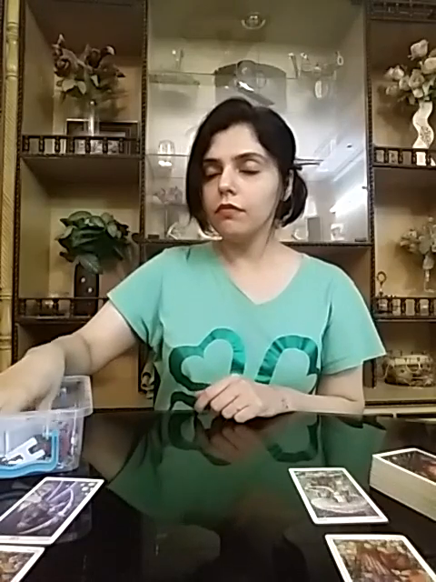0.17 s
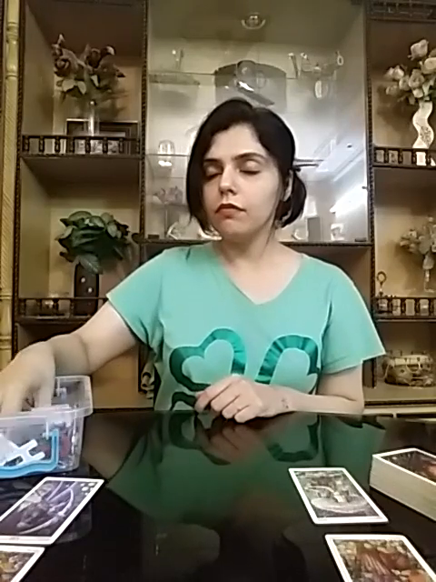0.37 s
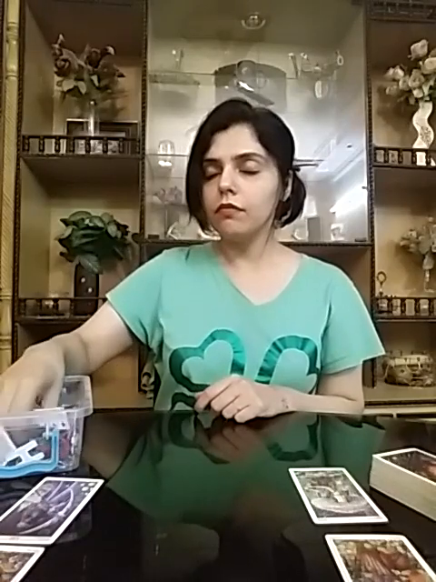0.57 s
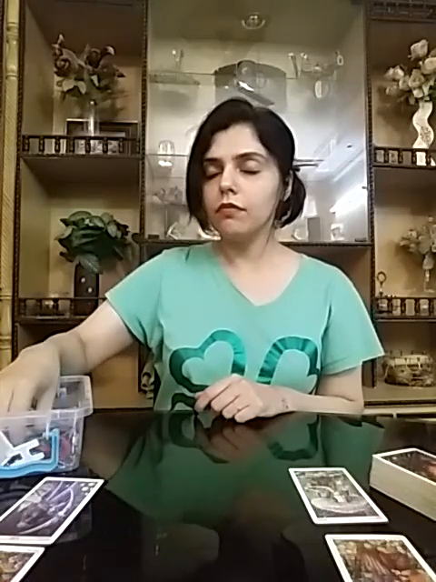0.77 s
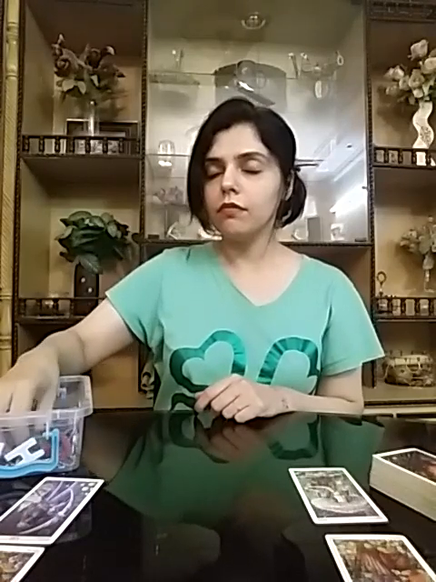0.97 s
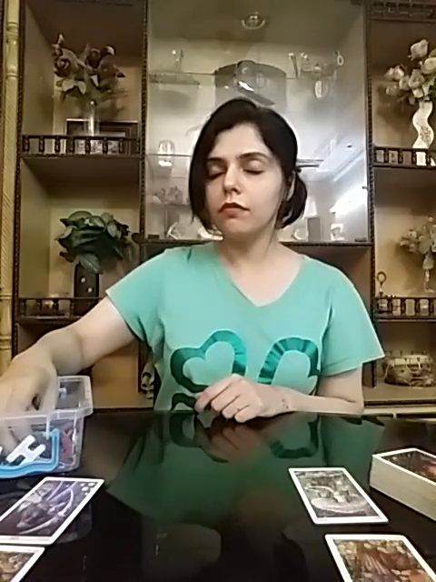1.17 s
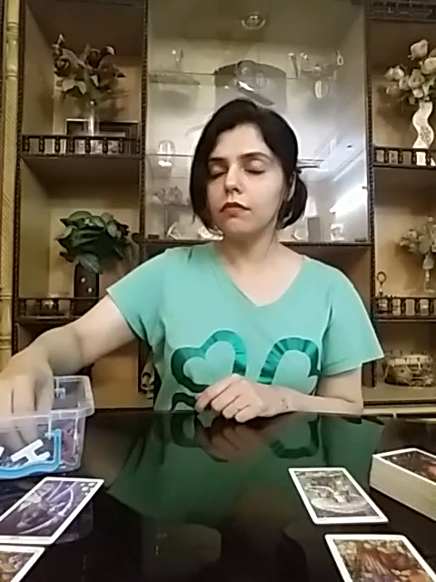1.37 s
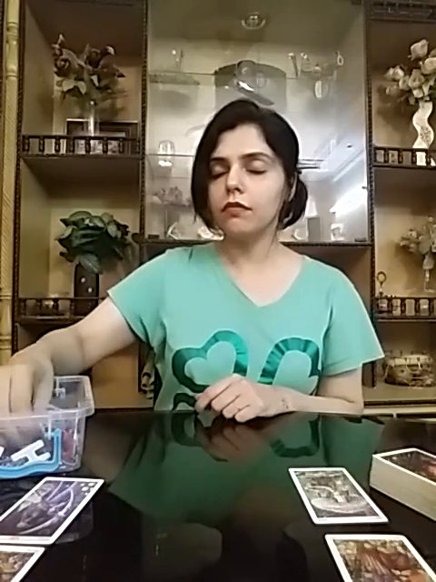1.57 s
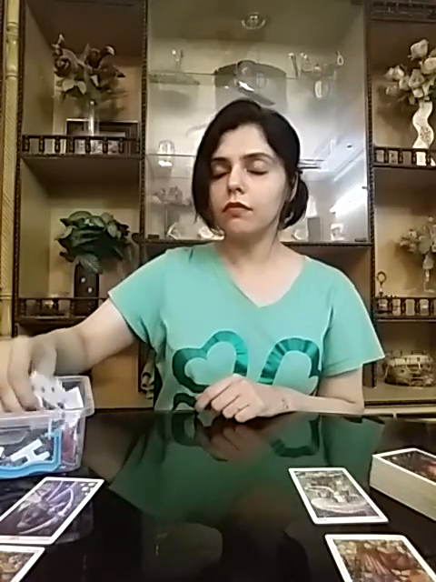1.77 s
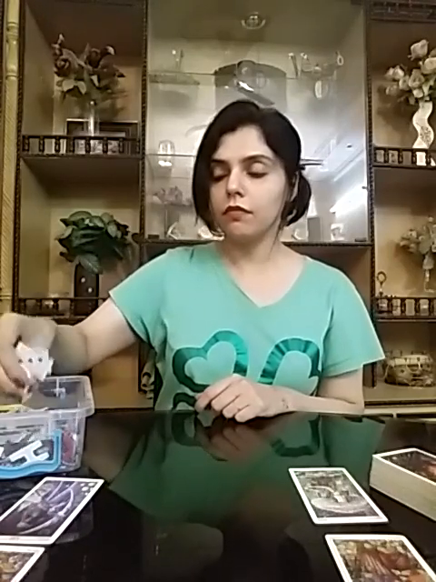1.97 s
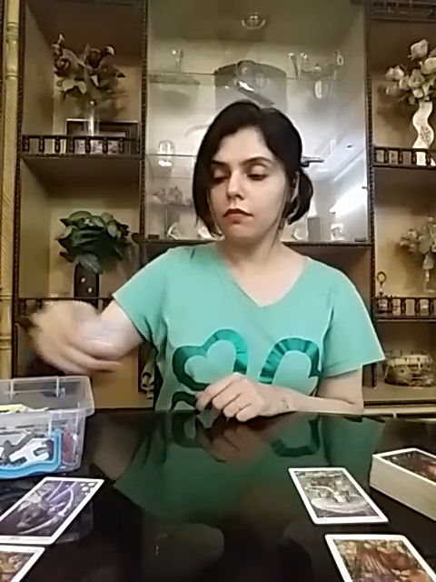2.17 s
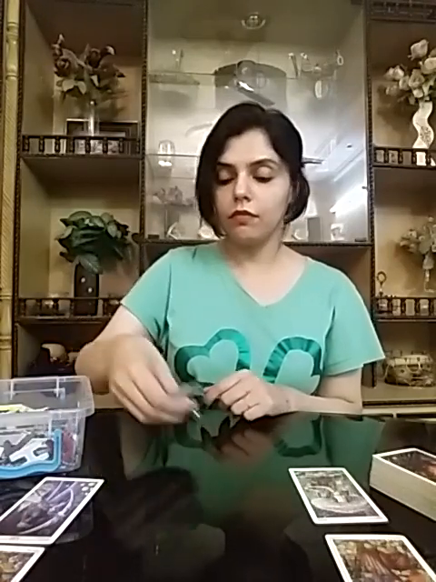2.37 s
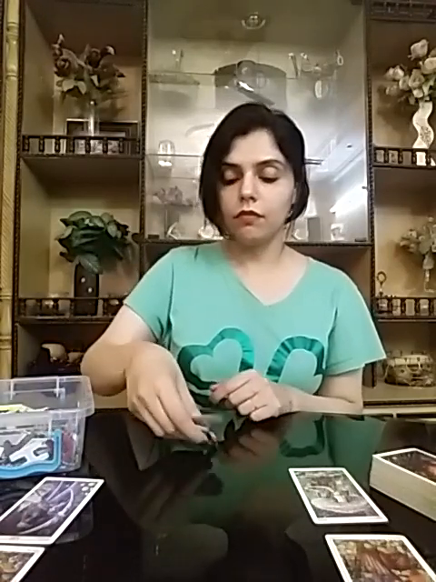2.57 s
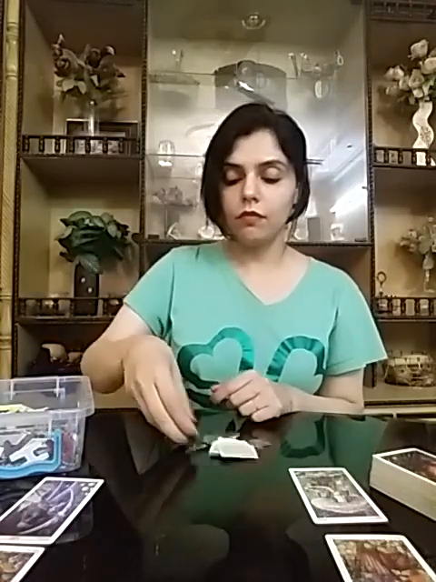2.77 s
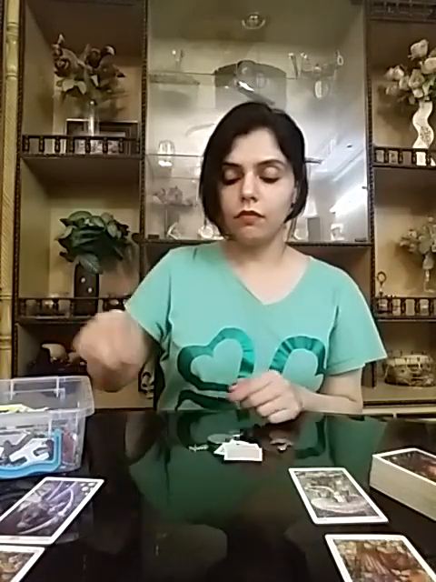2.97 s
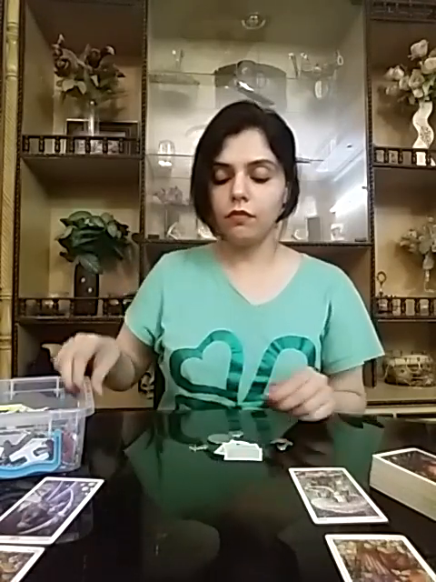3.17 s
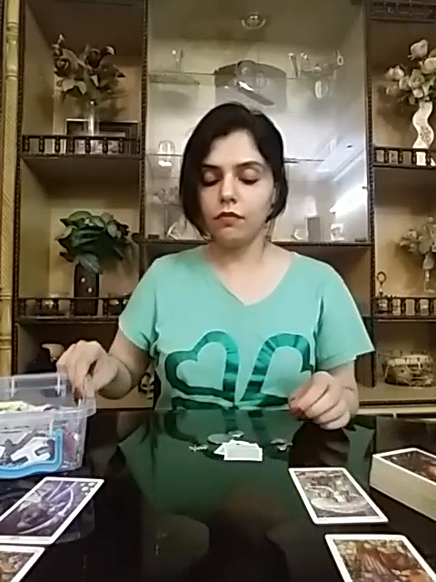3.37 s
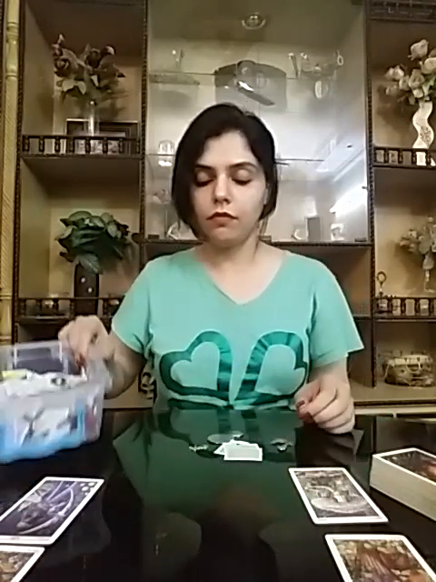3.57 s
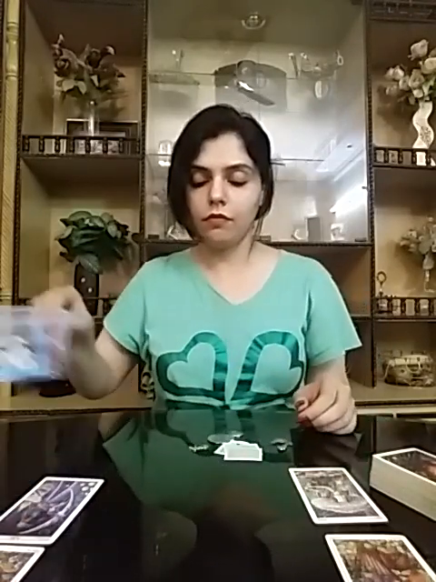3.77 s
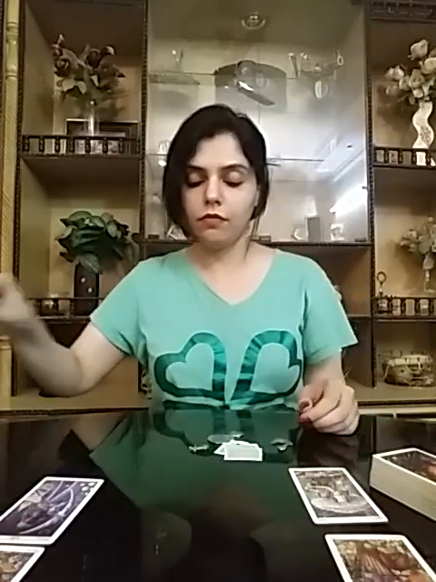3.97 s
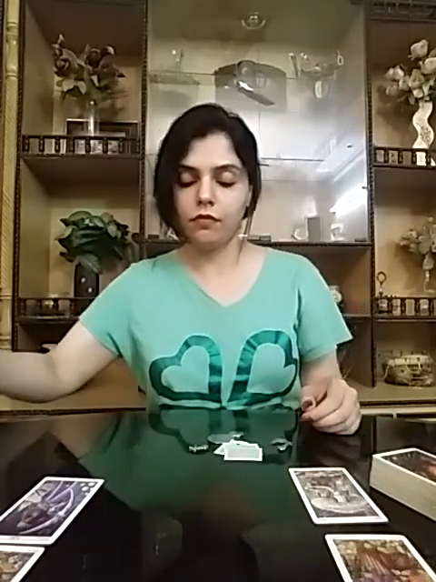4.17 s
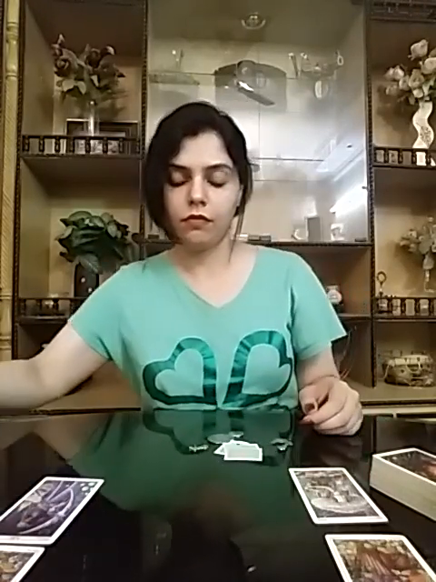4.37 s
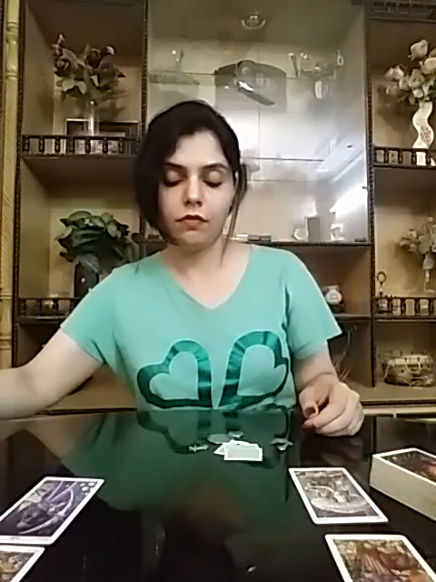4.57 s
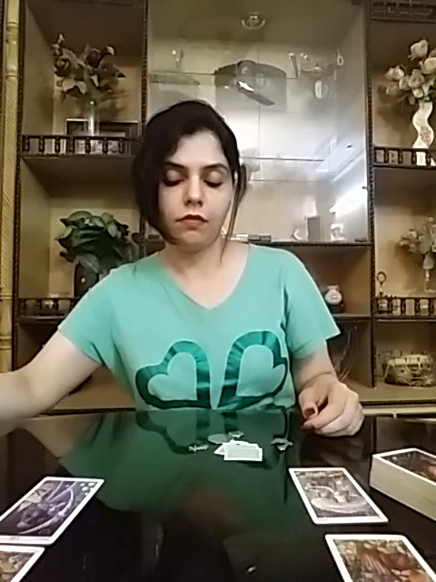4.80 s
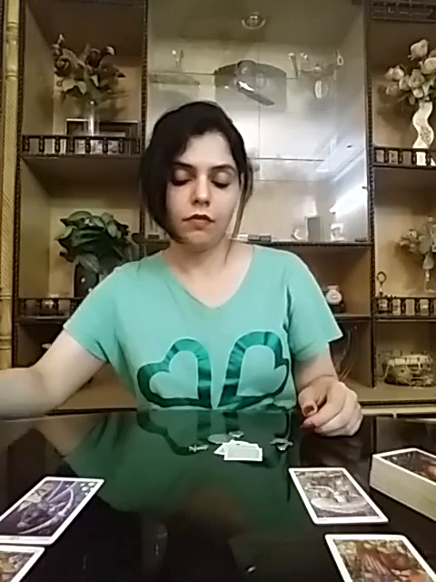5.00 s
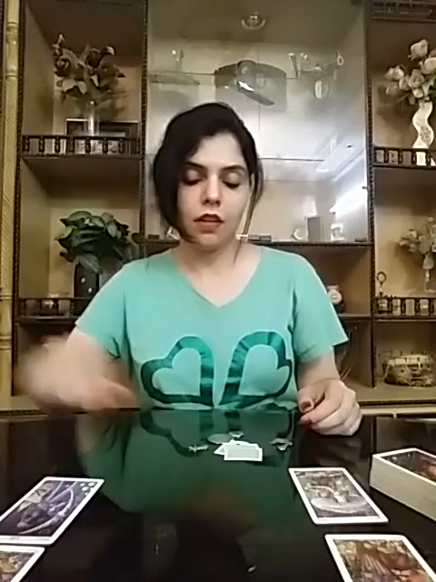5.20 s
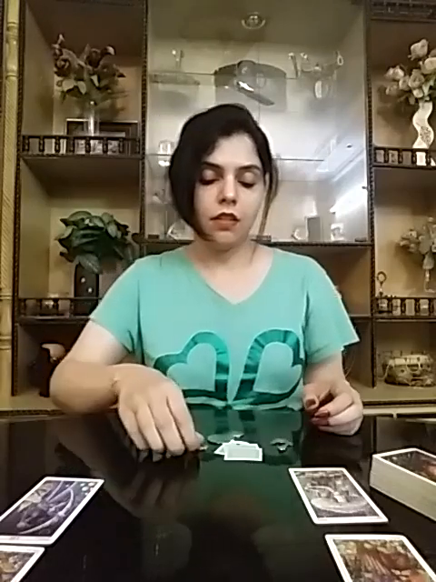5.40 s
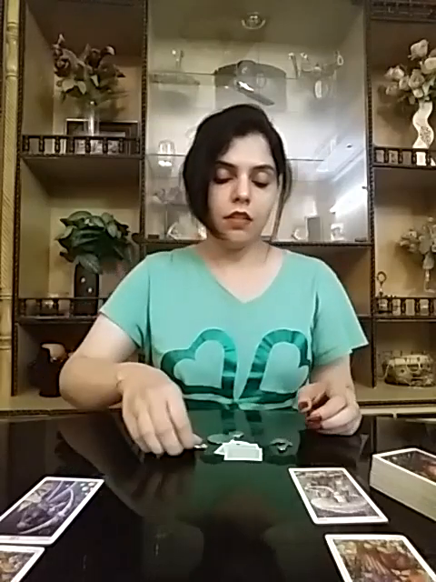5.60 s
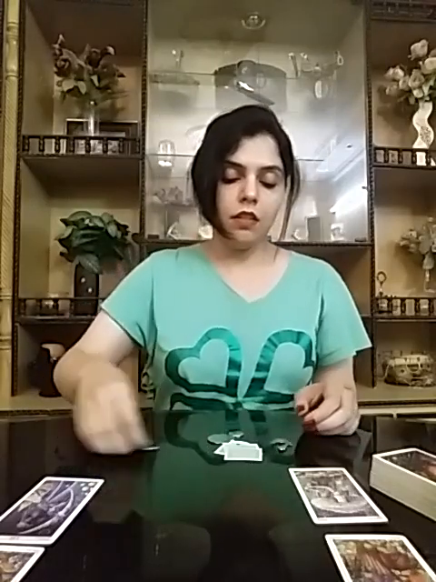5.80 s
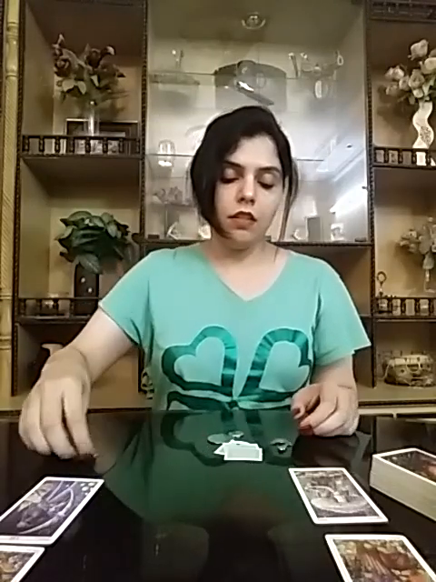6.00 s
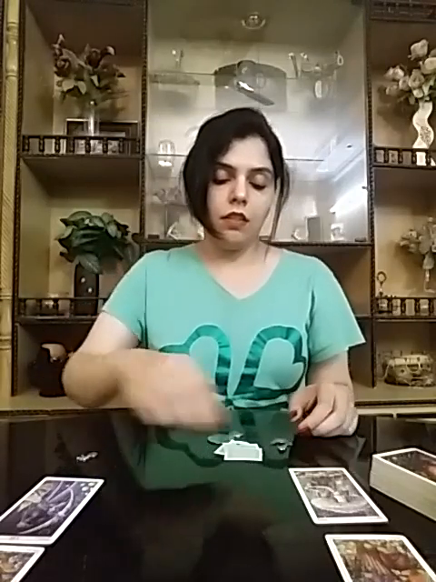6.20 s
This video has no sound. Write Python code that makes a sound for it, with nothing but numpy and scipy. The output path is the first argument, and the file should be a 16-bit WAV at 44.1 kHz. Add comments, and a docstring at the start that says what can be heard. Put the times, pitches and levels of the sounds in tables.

```python
"""A small, fairly live room, heard through a small microphone over soft steady noise and a wavering low hum.
A hand stirs small metal charms in a plastic box: they drum on its wall, rub together and ring.
A handful then clatters onto a hard tabletop, bounces, rings and is spread in two scraping sweeps.
The box is bumped and lifted, its charms slipping over the floor, then set down with two hollow knocks.
A few light clicks come before and after. Contacts are filtered clicks, rings are dying sine modes."""
import sys
import numpy as np
from scipy import signal
from scipy.fft import rfft, irfft
from scipy.io import wavfile
from scipy.ndimage import uniform_filter1d

SR = 44100
rng = np.random.default_rng(int(sys.argv[2]) if len(sys.argv) > 2 else 0)


def generate_wav(sig):
    """Save sig (samples, or channels by samples) to the path in sys.argv[1] as 16-bit PCM at SR."""
    pcm = np.round(np.clip(np.atleast_2d(sig).T, -1, 1) * 32767).astype(np.int16)
    wavfile.write(sys.argv[1], SR, pcm)


N = 275404
TIME = np.arange(N) / SR

# hardest knocks of charms on the box wall:
# (time [s], peak [dB], brightness [dB per octave], pitch of the spot struck [Hz])
BOX_HITS = [(0.095, -20, -10.5, 985), (0.274, -12.5, -0.5, 996), (0.292, -17, 2, 1560),
            (0.309, -6.5, 1.5, 1470), (0.394, -16, 12, 1460), (0.464, -19, -5, 1420),
            (0.572, -18.5, 3, 867), (0.701, -13, 6.5, 1230), (0.735, -10, 5, 1540), (0.818, -14, 7, 1690),
            (0.979, -13, 0, 1290), (1.098, -6, -1.5, 1430), (1.128, -15, -2, 1590), (1.173, -15.5, 0, 1610),
            (1.238, -7, -2, 2040), (1.243, -7.5, -2, 1460), (1.345, -14, 5, 1500), (1.482, -12, -2, 1440),
            (1.531, -17.5, 5.5, 1410), (1.62, -20.5, -6.5, 860), (1.695, -23, 3, 1740),
            (1.783, -26, 16, 1940), (1.818, -20, 14, 1210), (1.866, -20.5, -1, 1590),
            (1.917, -20.5, -2, 1520), (2.005, -21.5, 0, 1400), (3.61, -37.5, 9, 1780),
            (3.662, -39.5, -13.5, 760), (3.792, -28, -3, 1390), (3.981, -24, -1.5, 1470)]


def amp(db):
    """Decibels to gain."""
    return 10 ** (np.asarray(db) / 20)


def evened(x):
    """Scales to rms 1."""
    return x / np.sqrt(np.mean(x ** 2) + 1e-20)


def peaked(x, db):
    """Scales to a peak level."""
    return amp(db) * x / abs(x).max()


def read(points, hz):
    """Reads a table on a log-frequency axis."""
    f, value = np.transpose(points)
    return np.interp(np.log(hz + 1), np.log(f), value)


def add(mix, s, sound):
    """Mixes a sound in at time s."""
    part = mix[max(round(s * SR), 0):][:len(sound)]
    part += sound[:len(part)]


def noise_band(center_hz, width_hz):
    """Noise of rms 1 gathered around one frequency."""
    hz = np.fft.rfftfreq(N, 1 / SR)
    resonance = 1 / (1 + ((hz - center_hz) / width_hz) ** 2)
    return evened(irfft(rfft(rng.standard_normal(N)) * resonance, N))


def dying(t, t60):
    """Exponential decay that falls by 60 dB in t60 seconds."""
    return np.exp(-np.log(1000) * t / t60)


def ring(hz, t60):
    """One dying mode."""
    t = TIME[:SR // 2]
    return np.sin(2 * np.pi * hz * t) * dying(t, t60)


def contact(colour, uneven_db, buzz_db, buzz_t60, tilt_db=0, spot_hz=2000, spot_db=0):
    """One contact: a click whose colour depends on the spot hit, then a short buzz of the body."""
    hz = np.fft.rfftfreq(2048, 1 / SR)
    uneven = uniform_filter1d(rng.standard_normal(len(hz)), size=18)
    uneven = evened(uniform_filter1d(uneven, size=10))
    tilt = tilt_db * np.log2(np.clip(hz, 500, 4500) / 2000)
    spot = spot_db / (1 + ((hz - spot_hz) / (0.15 * spot_hz)) ** 2)
    db = read(colour, hz) + uneven_db * uneven + tilt + spot
    # minimum phase: the click starts at once and never before the blow
    log_gain = np.log(amp(np.concatenate([db, db[-2:0:-1]])))
    causal = np.exp(np.conj(signal.hilbert(log_gain)))[:len(hz)]
    # bending waves carry the highs faster than the lows, which blunts the first spike
    click = irfft(causal * np.exp(-1j * np.sqrt(hz / 12)))
    t = TIME[:SR // 10]
    buzz = rng.standard_normal(len(t)) * dying(t, buzz_t60) * (t > .001)
    buzz = amp(buzz_db) * buzz / np.linalg.norm(buzz)
    # the blow lasts about a tenth of a millisecond, so the highest treble lives only in the buzz
    blow = np.exp(-((t - 1e-4) / 4.5e-5) ** 2)
    return signal.fftconvolve(click, blow / blow.sum() + buzz)


def collisions(per_s, spread_db):
    """Random impulses, many small and a few large, with a roughly steady power of 1."""
    size = amp(spread_db * np.minimum(rng.exponential(1, N), 4)) * rng.choice([-1, 1], N)
    train = size * (rng.random(N) < per_s / SR)
    power = uniform_filter1d(uniform_filter1d(train ** 2, size=1800), size=900)
    return train / np.sqrt(np.maximum(power, per_s / SR / 2))


def clatter(train, colour, uneven_db, buzz_db, buzz_t60, count=28):
    """Each impulse strikes one of several spots, each with its own colour."""
    clicks = [contact(colour, uneven_db, buzz_db, buzz_t60) for _ in range(count)]
    clicks = [click / np.linalg.norm(click) for click in clicks]
    spot, out = rng.integers(0, count, N), np.zeros(N)
    for at in np.flatnonzero(abs(train) > 1e-6):
        add(out, at / SR, train[at] * clicks[spot[at]])
    return out


def jingle(force, per_s, damping, detune, column, count=5):
    """Colliding charms ring in their modes; alike charms lie slightly apart in pitch."""
    # modes of a charm: (frequency [Hz], t60 before damping [s],
    # relative level in the box [dB], relative level on the table [dB])
    charm_modes = [(5380, 0.044, 0, -7.5), (5720, 0.066, -10, -3.5), (5980, .2, -15.5, -5.5),
                   (8720, .12, -6.5, -8), (8970, 0.35, -7.5, -1), (11600, 0.14, -4.5, -9.5),
                   (12100, .08, -6.5, -12), (13706, .1, -13, -26), (14100, .14, -7, -29),
                   (15000, 0.145, -19, -7), (15251, .15, -14, -16), (16100, 0.097, -6, -3)]
    out = np.zeros(N)
    for mode in charm_modes:
        hz, t60 = mode[:2]
        tones = [ring(hz * (1 + detune * rng.uniform(-0.9, 1)), t60 / damping) for _ in range(count)]
        tones = [tone / np.linalg.norm(tone) for tone in tones]
        gain = amp(mode[column]) * np.sqrt(SR / per_s)
        for place, size, which in rng.random((round(per_s * N / SR), 3)):
            strength = gain * force[int(place * N)] * size
            add(out, place * N / SR, strength * tones[int(which * count)])
    return out


def push(t, length, rise_s, sag_db_per_s, settle_db_per_s):
    """Gain of one movement: a quick rise, a slow sag (growth if negative) while it lasts, then a fade."""
    t = np.maximum(t, 0)
    sag_db = sag_db_per_s * np.minimum(t, length)
    settle_db = settle_db_per_s * np.maximum(t - length, 0)
    return np.minimum(t / rise_s, 1) * amp(-sag_db - settle_db)


def effort(moves, rise_s, sag_db_per_s, settle_db_per_s):
    """Joint gain of a table of movements, one curve for each of its dB columns."""
    t, power = TIME[::20], 0
    for start, length, *db in moves:
        gain = push(t - start, length, rise_s, sag_db_per_s, settle_db_per_s)
        power = power + (amp(db)[:, None] * gain) ** 2
    return [np.interp(TIME, t, np.sqrt(column)) for column in power]


def flurries(hits, below_db, rise_s, fade_db_per_s):
    """Gain of the small collisions that follow each hard hit, set below that hit's peak."""
    moves = [(s, rise_s, db + below_db) for s, db, *_ in hits]
    return effort(moves, rise_s, fade_db_per_s, fade_db_per_s)[0]


def background():
    """Soft steady room noise, with narrow-band noise as a wavering low hum."""
    # colour of the air in the room: (frequency [Hz], relative density [dB])
    air_colour = [(25, -8), (45, -15), (75, 2.5), (150, -1), (260, 0), (500, -6), (1000, -9.5), (2000, -16),
                  (3800, -16.5), (4400, -20), (5200, -35), (6500, -31), (16000, -27.5)]
    hz = np.fft.rfftfreq(N, 1 / SR)
    hiss = irfft(rfft(rng.standard_normal(N)) * amp(read(air_colour, hz)), N)
    hum = noise_band(center_hz=148, width_hz=4)
    return amp(-57.5) * evened(hiss) + amp(-64.5) * hum


def room(x, count=4):
    """Dense reflections, each band dying at its own speed, crossfading through four patterns."""
    # decay of the room: (frequency [Hz], t60 [s])
    room_decay = [(100, 1), (300, 0.37), (800, 0.5), (2000, 0.37), (5000, 0.49), (14000, 0.59)]
    out = np.zeros(N)
    for k in range(count):
        # random reflections, 4000 a second, the first after 4 ms
        echoes = rng.choice([-1., 1.], SR) * (rng.random(SR) < 4000 / SR) * (TIME[:SR] > .004)
        hz, t, z = signal.stft(echoes, SR, nperseg=256)
        tail = signal.istft(z * dying(t, read(room_decay, hz)[:, None]), SR)[1]
        # the sound moves on to the next pattern 45 times a second
        place = (TIME * 45 + k) % count
        share = np.sin(np.pi / 2 * place) * (place < 2)
        out += signal.oaconvolve(x * share, tail / np.linalg.norm(tail))[:N]
    return out


def table_rumble(force):
    """Hand, box and charms shake the tabletop, which answers with a soft low rumble."""
    # the fourth root keeps the rumble present under weak movements
    return amp(-52.5) * noise_band(center_hz=102, width_hz=22) * force ** 0.25


def light_clicks():
    """Fingernails and small things click; returns the direct sound and the share sent to the room."""
    # (time [s], peak [dB], brightness [dB per octave], pitch [Hz], room send [dB])
    click_hits = [(4.317, -47, -1.5, 3960, 9.5), (4.335, -46, 3, 3800, -5), (5.207, -28, 4, 4200, -11),
                  (5.218, -30, 14, 2400, -8.5), (5.2235, -36, -3, 2050, -10), (5.279, -38.5, -4.5, 2950, 4),
                  (5.558, -38.5, -6, 1700, -3), (5.567, -34.5, -1, 3500, -1.5), (5.58, -42, 2, 3750, 1),
                  (5.813, -42, 3.5, 3400, -17), (6.04, -30.5, -1, 2720, 0)]
    # colour of a light click: (frequency [Hz], level [dB])
    nail_colour = [(60, -41), (600, 2), (1200, -3), (2200, 7.5), (2800, -0.5), (3300, 2.5), (4000, 1.5),
                   (6200, -11), (8000, -17), (16000, -23)]
    direct, sent = np.zeros(N), np.zeros(N)
    for s, db, tilt_db, hz, room_db in click_hits:
        click = contact(nail_colour, uneven_db=1, buzz_db=-6, buzz_t60=.012,
                        tilt_db=tilt_db, spot_hz=hz, spot_db=9)
        add(direct, s, peaked(click, db))
        add(sent, s, peaked(click, db + room_db))
    return direct, sent


def box_bumps():
    """A hollow knock and a low thud of the surface beneath; returns the direct sound and the room's share."""
    # box bumped and set down: (time [s], knock peak [dB], brightness [dB per octave],
    # relative thud level [dB], relative room send [dB])
    bump_hits = [(3.342, -25.5, -4.5, -50, -4), (3.522, -26.5, -7, -68, -8.5), (3.535, -29.5, -5, -68, -14),
                 (4.402, -44, 3.5, -85, 8), (4.6607, -11.5, -5.5, -28, -2.5), (4.6623, -11, 8, -44, 0.5),
                 (4.668, -13, 1, -55, -8), (4.676, -11.5, 3.5, -51, -7), (4.709, -15.5, 3, -46, -2),
                 (4.8575, -8.5, 0.5, -44, -3), (4.869, -16.5, 12.5, -52, -4)]
    # colour of the hollow box: (frequency [Hz], level [dB])
    hollow_colour = [(50, -14), (100, -12), (200, -8.5), (380, -3.5), (580, -1), (1000, 3.5), (1500, 0),
                     (2100, 1.5), (2700, -3.5), (3800, -5), (5000, -16.5), (7000, -25.5), (10000, -32),
                     (16000, -36)]
    direct, sent = np.zeros(N), np.zeros(N)
    for s, db, tilt_db, thud_db, room_db in bump_hits:
        thud_onset = 1 - np.exp(-TIME[:SR // 2] / 0.0072)
        bump = amp(thud_db - 3.5) * ring(hz=94, t60=0.16) * thud_onset
        knock = contact(hollow_colour, uneven_db=.5, buzz_db=-11, buzz_t60=.025, tilt_db=tilt_db)
        add(bump, 0, peaked(knock, db))
        add(direct, s, bump)
        add(sent, s, amp(room_db + 2.5) * bump)
    return direct, sent


def charms_shifting():
    """Charms slip over the floor of the tipped and lifted box in soft, dull contacts."""
    # lifts of the box: (start [s], length [s], relative level [dB])
    lifts = [(3.475, .07, -43.5), (3.655, 0.15, -49)]
    # colour of a contact with the box floor: (frequency [Hz], level [dB])
    floor_colour = [(80, -20), (400, -8.5), (750, -8), (1300, -8), (2300, -3), (3200, -9), (5200, -12.5),
                    (7000, -30), (16000, -32)]
    force, = effort(lifts, rise_s=0.0084, sag_db_per_s=11.5, settle_db_per_s=173.5)
    slips = force * collisions(per_s=450, spread_db=3.5)
    return amp(-2.5) * clatter(slips, floor_colour, uneven_db=3, buzz_db=-4, buzz_t60=0.031)


def single_chimes():
    """Now and then one charm chatters against its neighbours, and its ring swells and dies."""
    # charms ringing out freely: (time [s], pitch [Hz], peak [dB])
    free_rings = [(0.31, 14100, -36), (0.72, 13750, -41), (0.83, 12230, -40), (0.87, 8960, -32.5),
                  (1.223, 9020, -38), (1.23, 15400, -40.5), (1.825, 14000, -52), (1.885, 14000, -47),
                  (1.93, 13300, -51), (2.571, 9200, -53), (2.677, 15300, -24), (2.711, 5460, -23.5),
                  (2.79, 8880, -28), (2.955, 8900, -23), (3.02, 8974, -39)]
    out, t = np.zeros(N), TIME[:SR // 10]
    for s, hz, db in free_rings:
        chatter = rng.standard_normal(len(t)) * (rng.random(len(t)) < 900 / SR) * np.exp(-t / 0.015)
        add(out, s, peaked(signal.fftconvolve(chatter, ring(hz, t60=0.11)), db))
    return out


def pour_effort():
    """Gains of clatter and ringing as a few charms trickle out before the rest pour."""
    # (start [s], length [s], relative clatter [dB], relative ringing [dB])
    pours = [(2.572, .11, -42, -43.5), (2.68, 0.29, -25.5, -34.5)]
    return effort(pours, rise_s=0.0068, sag_db_per_s=-0.5, settle_db_per_s=300)


def sweep_effort():
    """Gain of the hand's sweeps that spread the charms over the tabletop."""
    # (start [s], length [s], relative level [dB])
    sweeps = [(3.005, 0.14, -34), (3.155, 0.15, -33)]
    return effort(sweeps, rise_s=0.0052, sag_db_per_s=15, settle_db_per_s=380)[0]


def charms_on_table(pouring, ringing, sliding):
    """The handful lands, bounces and rings, then scrapes over the tabletop."""
    # heaviest charms landing: (time [s], peak [dB])
    landings = [(2.571, -11), (2.618, -18.5), (2.6302, -11), (2.6584, -21), (2.6807, -11), (2.712, -13),
                (2.721, -13), (2.737, -11), (2.746, -16), (2.7725, -11), (2.797, -7.5), (2.842, -10.5),
                (2.853, -11), (2.905, -10.5), (2.908, -12.5), (2.949, -10), (2.982, -10.5), (3.015, -11.5),
                (3.105, -23.5), (3.166, -23)]
    # colour of a contact with the tabletop: (frequency [Hz], level [dB])
    table_colour = [(50, -30), (110, -23), (350, -15), (700, -12.5), (1300, -9), (1800, 2.5), (2450, 4),
                    (3200, -4), (3900, 0.5), (6500, -17), (8400, -12.5), (10000, -21.5), (16000, -24)]
    # colour of a scraping contact: (frequency [Hz], level [dB])
    scrape_colour = [(60, -31), (400, -27), (1000, -16), (1800, -14.5), (2500, -1), (3300, -7), (5500, -15),
                     (8000, -22.5), (11000, -27.5), (14500, -35), (15300, -20), (16000, -28)]
    out = np.zeros(N)
    for s, db in landings:
        hit = contact(table_colour, uneven_db=0.5, buzz_db=-4.5, buzz_t60=0.035, tilt_db=-0.5)
        add(out, s, peaked(hit, db))
    # a charm that lands sets off a flurry of bounces
    bouncing = flurries(landings, below_db=-19, rise_s=0.013, fade_db_per_s=500)
    drops = np.hypot(pouring, bouncing) * collisions(per_s=750, spread_db=2.5)
    out += amp(-3.0) * clatter(drops, table_colour, uneven_db=5.5, buzz_db=4.0, buzz_t60=0.031)
    scrapes = sliding * collisions(per_s=1400, spread_db=0.5)
    out += amp(-3.0) * clatter(scrapes, scrape_colour, uneven_db=3.5, buzz_db=2.5, buzz_t60=0.044)
    ring_force = ringing + amp(-24) * sliding
    return out + amp(-1.5) * jingle(ring_force, per_s=54, damping=1.7, detune=0.0087, column=3)


def stir_effort():
    """Gains of drumming and rubbing: each push rises quickly, sags, and the charms then settle."""
    # pushes as the hand digs in: (start [s], length [s], relative drumming on the wall [dB],
    # relative rubbing of metal on metal [dB])
    stirs = [(-0.015, 0.14, -29.5, -47.5), (.19, 0.11, -30, -50.5), (.275, 0.23, -23, -39.5),
             (.56, 0.093, -29.5, -49), (.695, 0.072, -23, -41.5), (.815, 0.064, -24, -41),
             (.92, 0.31, -26.5, -44.5), (1.222, 0.019, -24, -38), (1.3, 0.084, -29, -48),
             (1.395, 0.039, -27, -44.5), (1.528, 0.016, -33.5, -53), (1.6, 0.22, -41.5, -61.5),
             (1.815, 0.0083, -28.5, -47), (1.875, 0.068, -38.5, -57), (2.002, 0.0093, -38, -52)]
    return effort(stirs, rise_s=0.0084, sag_db_per_s=11.5, settle_db_per_s=173.5)


def charms_in_box(stirring, rubbing):
    """Stirred charms drum on thin plastic, rub together and ring briefly, damped by their neighbours."""
    # colour of a contact with the box: (frequency [Hz], level [dB])
    box_colour = [(50, -40), (110, -19.5), (400, -20), (700, -16.5), (950, -7.5), (1120, -12), (1480, -7),
                  (1850, -8.5), (2230, -1), (2800, -12), (4000, -7.5), (5400, -11.5), (7000, -34),
                  (10000, -33.5), (16000, -33.5)]
    # colour of metal rubbing on metal: (frequency [Hz], level [dB])
    rub_colour = [(100, -50), (2500, -24), (5000, -3.5), (6500, 2), (8500, -3), (10500, -3), (12200, -20),
                  (13000, 2), (14100, -2), (16000, -13)]
    # a hard knock jolts the heap
    jolts = flurries(BOX_HITS, below_db=-23, rise_s=0.011, fade_db_per_s=601)
    drumming = np.hypot(stirring, jolts) * collisions(per_s=550, spread_db=2.5)
    out = amp(-3.0) * clatter(drumming, box_colour, uneven_db=4.0, buzz_db=-2.0, buzz_t60=0.041)
    rubs = rubbing * collisions(per_s=1600, spread_db=4.0)
    out += amp(-1) * clatter(rubs, rub_colour, uneven_db=0.5, buzz_db=-15, buzz_t60=0.035)
    return out + amp(-8.0) * jingle(rubbing, per_s=66, damping=2.6, detune=0.011, column=2)


def wall_knocks(stirring):
    """Single charms knock on the box wall, which rings for a few cycles; lighter knocks fall at random."""
    # colour of a knock on the wall: (frequency [Hz], level [dB])
    wall_colour = [(100, -27), (450, -34.5), (750, -10), (950, -13.5), (1130, -17), (1460, -4.5),
                   (1830, -12), (2230, 3), (2450, -3), (2800, -22), (4000, -16), (5400, -19), (7000, -32),
                   (16000, -41)]
    light = stirring * collisions(per_s=85, spread_db=1.5)
    out = amp(-8.5) * clatter(light, wall_colour, uneven_db=4.5, buzz_db=-6.5, buzz_t60=0.025)
    for s, db, tilt_db, hz in BOX_HITS:
        knock = contact(wall_colour, uneven_db=1.5, buzz_db=-9, buzz_t60=.02,
                        tilt_db=tilt_db, spot_hz=hz, spot_db=5)
        # the knock sounds half a millisecond after the listed time
        add(out, s + .0005, peaked(knock, db))
    return out


def scene():
    """Movements of hand and box drive the charms, bumps and clicks join them, and the room reflects them."""
    stirring, rubbing = stir_effort()
    pouring, ringing = pour_effort()
    sliding = sweep_effort()
    rumble = table_rumble(stirring + pouring + sliding)
    clicks, clicks_sent = light_clicks()
    bumps, bumps_sent = box_bumps()
    rings = single_chimes()
    table = charms_on_table(pouring, ringing, sliding)
    box = charms_in_box(stirring, rubbing) + charms_shifting()
    knocks = wall_knocks(stirring)
    sent = amp(-3.5) * box + amp(-8.5) * knocks + amp(-3.5) * table + amp(-9.0) * rings
    sent += bumps_sent + clicks_sent
    direct = box + knocks + table + bumps + rings + clicks + rumble
    return (direct + room(sent) + background())[None]


def record(dry):
    """The small microphone's bass roll-off and the recorder's band limit."""
    bass_cut = signal.butter(2, 60, "highpass", fs=SR, output="sos")
    thin = signal.sosfilt(bass_cut, dry)
    edge_hz = 15790
    band_limit = signal.firwin(511, edge_hz, window=("kaiser", 9), fs=SR)
    return signal.oaconvolve(thin, band_limit[None], "same")


dry = scene()
out = record(dry)
generate_wav(out)
```